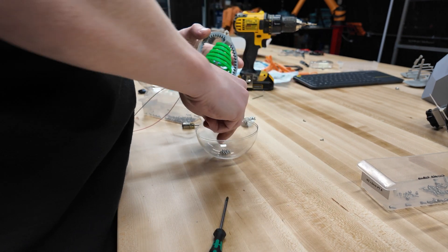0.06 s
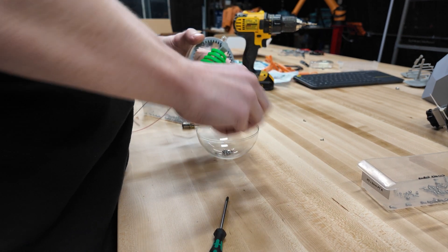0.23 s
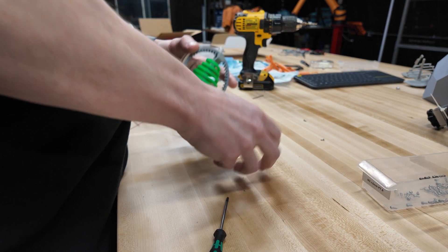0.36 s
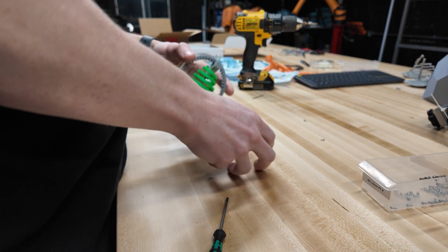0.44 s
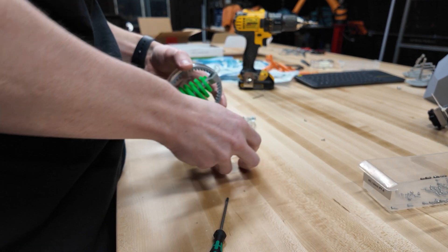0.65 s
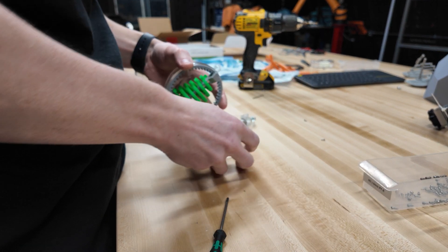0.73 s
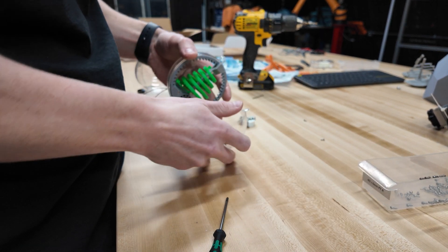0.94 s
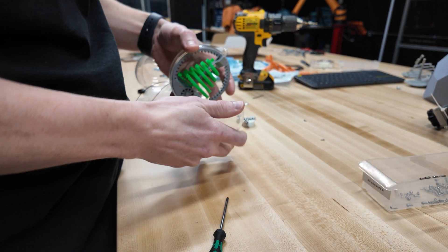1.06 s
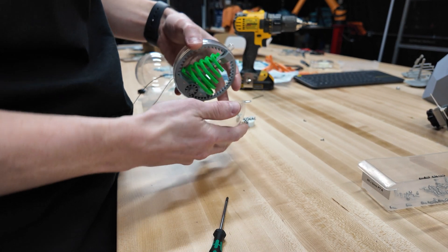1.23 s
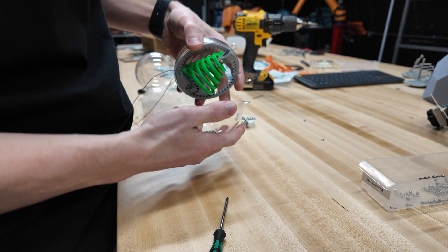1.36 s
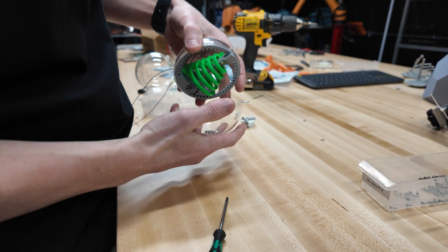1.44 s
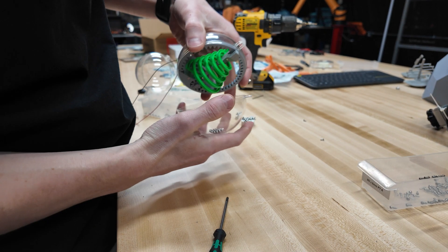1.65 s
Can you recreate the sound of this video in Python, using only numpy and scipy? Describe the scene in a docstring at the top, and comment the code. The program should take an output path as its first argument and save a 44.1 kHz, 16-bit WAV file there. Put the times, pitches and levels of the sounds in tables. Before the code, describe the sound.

Small hard balls drop into a thin plastic bowl at about 0.25 seconds with two sharp, bright clacks. They bounce, roll and circle with a faint hollow note, settling by 0.9 seconds. From 1.1 seconds they tick and roll faintly in a hand-held plastic shell, ending with two light clicks near 1.6 seconds. Soft handling bumps, rubbing and a low workshop ventilation hum lie underneath.

```python
"""Over a workshop's ventilation hum, hands bump and rub on plastic. A quarter second in, small hard
balls drop into a thin plastic bowl on the bench: each hit snaps, cracks and rings the bowl's modes.
They clatter, roll and circle with a hollow note, and settle before the first second is out. Then they
tick and roll faintly in a plastic shell turned in the hands, ending on two clicks at its rim.
The workshop gives the balls a bright tail throughout."""
import sys
import numpy as np
from scipy import signal
from scipy.io import wavfile
from scipy.ndimage import uniform_filter1d

SR = 44100
rng = np.random.default_rng(int(sys.argv[2]) if len(sys.argv) > 2 else 0)


def wrap_up_sound(samples):
    """Save the sound to the file named by the first command line argument, as 16-bit audio."""
    columns = np.atleast_2d(samples).T
    # keep every value between -1 and 1, then stretch to whole-number steps
    tamed = np.clip(columns, -1, 1)
    steps = np.round(tamed * 32767).astype(np.int16)
    wavfile.write(sys.argv[1], SR, steps)


N = 74970
T = np.arange(N) / SR

# ventilation air, its colour: frequency_hz, gain_db
AIR_EQ = [(28, -35.5), (55, -20.5), (110, -10), (160, -4.5), (250, -2), (310, -10), (500, -7), (800, -15),
          (1100, -14), (2000, -23.5), (4400, -31), (7000, -42.5), (15000, -51.5)]
# a brief dip in the air: time_s, gain_db
AIR_RIDE = [(0.5, 1), (0.75, -2.5), (1.35, 0)]
# ventilation hum lines: pitch_hz, level_db
HUM_LINES = [(60, -72.5), (219, -60), (243, -61), (362, -57.5)]
# swell of a thin whine: time_s, level_db
WHINE_RIDE = [(0.95, -68.5), (1.35, -60.5), (1.7, -68.5)]
# decay of the workshop's tail: frequency_hz, t60_s
ROOM_DECAY = [(500, 1), (3000, 0), (6000, .5), (10000, 0.18), (15000, 0.6)]
# colour of its echoes: frequency_hz, gain_db
ROOM_EQ = [(500, -7.5), (3000, -4), (4700, 4), (6000, 2.5), (7200, -4.5), (10000, -6), (15000, -2.5)]

# fingers sliding on plastic: frequency_hz, gain_db
RUB_EQ = [(400, -12), (1050, -1), (1550, -1.5), (1900, -10.5), (3500, -8), (7000, -30.5)]
# swell of that rub: time_s, level_db
RUB_RIDE = [(0, -74), (0.7, -65), (1.08, -68.5), (1.2, -62.5), (1.45, -58), (1.7, -63)]
# soft handling bumps: start_s, level_db, pitch_hz
HAND_BUMPS = [(0.030, -37.5, 235), (0.07, -43, 156), (0.084, -41.5, 216), (0.167, -43.5, 257.5),
              (0.205, -47.5, 136.4), (0.363, -37, 227), (0.474, -41.5, 235.5), (0.873, -45, 252.3),
              (1.267, -36.5, 232), (1.489, -41.5, 167.4)]
# hollow note of a circling ball: time_s, pitch_hz, level_db
CIRCLING_NOTE = [(0.239, 431, -72), (0.291, 448.3, -57), (0.379, 475, -60.5), (0.47, 491.8, -54),
                 (0.55, 499, -57.5), (0.62, 472, -56.5), (0.67, 480, -84)]
# rolling in the bowl: time_s, level_db
BOWL_ROLL_RIDE = [(0.28, -85), (0.31, -39), (0.39, -41), (0.45, -50.5), (0.53, -49.5), (0.59, -63.5),
                  (0.65, -47), (0.69, -54), (0.74, -70), (0.86, -78.5), (1.1, -85)]
# rolling in the hand-held shell: time_s, level_db
SHELL_ROLL_RIDE = [(0.9, -95), (1.12, -80), (1.18, -56), (1.27, -62), (1.32, -67.5), (1.42, -58.5),
                   (1.46, -53.5), (1.55, -69), (1.59, -78), (1.63, -55), (1.7, -77)]

# light ticks in the shell: start_s, level_db, tilt_db_per_octave
SHELL_TICKS = [(1.1415, -44.5, -4), (1.162, -48.5, -5.5), (1.18, -37.5, -3), (1.1880, -36.5, -1),
               (1.2051, -33.5, 3), (1.225, -39.5, 5.5), (1.242, -42, -3), (1.271, -41.5, 1),
               (1.281, -49, 1), (1.38, -37.5, 7), (1.386, -43, -1), (1.4073, -42, -2), (1.43, -33, 11),
               (1.4377, -33.5, 14), (1.4435, -34.5, 6), (1.448, -35.5, 2), (1.494, -37.5, 8),
               (1.5050, -37, -2), (1.512, -30, -0.5), (1.5203, -34, 0), (1.527, -42, 1), (1.534, -37.5, -4),
               (1.5447, -35, -2), (1.549, -39, -10), (1.555, -45, 7), (1.563, -46, 2), (1.61, -38.5, -1),
               (1.6245, -39.5, -11)]
# colour of a tick: frequency_hz, gain_db
TICK_EQ = [(1000, -12), (2500, -12), (4200, -6), (5300, 8.5), (6800, 7), (8500, -0.5), (10000, -5),
           (12000, -15.5), (16000, -40)]
# clicks on the shell's rim: start_s, level_db
RIM_CLICKS = [(1.6295, -33), (1.6576, -40)]
# the bowl's modes: pitch_hz, hard_drop_db, light_bounce_db, t60_s
PLASTIC_MODES = [(1640, -30, -29, .05), (5290, -18, -9, .036), (5850, -18, -9, .03), (6615, -.5, -4, .032),
                 (7170, -14, -10, .032), (7900, -5.5, -7, .034), (8800, -5, -4.5, .036),
                 (9330, -10, -10, .03), (9850, 2, -7.5, .032), (11075, -14, -15, .03),
                 (12380, -13, -15.5, .028), (13355, -9.5, -24, .022), (13895, -11.5, -24, .022),
                 (15420, -24, -30, .022)]
# snap at the instant of contact: frequency_hz, gain_db
SNAP_EQ = [(200, -27.5), (900, -12.5), (1600, -2.5), (2450, -16.5), (3300, -1.5), (4300, 0), (6000, 6),
           (9500, -1), (16000, -23)]
# crack just behind the snap: frequency_hz, gain_db
CRACK_EQ = [(120, -45), (900, -23.5), (1600, -18.5), (2450, -33.5), (3300, -21.5), (4300, -16.5),
            (5500, 2.5), (7000, 3.5), (9800, -7), (11000, -13), (14000, -22.5), (16500, -31.5)]
# balls hitting the bowl: start_s, level_db
BOWL_HITS = [(0.2370, 1), (0.2630, 1), (0.2919, -7), (0.296, -7), (0.299, -13), (0.3288, -11), (0.336, -11),
             (0.351, -22), (0.3616, -12), (0.3782, -17), (0.3894, -20), (0.398, -26.5), (0.456, -25.5),
             (0.4718, -17.5), (0.4802, -23.5), (0.4941, -17), (0.498, -19.5), (0.5072, -21), (0.543, -23.5),
             (0.549, -29.5), (0.621, -35), (0.6294, -37), (0.6397, -24.5), (0.653, -38), (0.6780, -33),
             (0.6884, -23.5), (0.6957, -25.5), (0.7573, -37.5), (0.8060, -40), (0.8143, -33.5),
             (0.821, -35.5), (0.8945, -48), (0.9078, -41)]

AIR_DB, AIR_PATCH_DB, WHINE_HZ, WAVER_HZ, WAVER_DB = -52, 1.5, 1082, 1, 2
TAIL_DB, PREDELAY_S, EARLY_DB, EARLY_T60_S = -12.5, 0.013, -14.5, 0.09
BUMP_ATTACK_S, BUMP_T60_S = 0.015, 0.25
CONTACTS_PER_S, CONTACT_SPREAD_DB, BOWL_GRIT_DB, SHELL_ROLL_RING_DB = 610, 3.5, -3, -7.5
TICK_SNAP_DB, TICK_CRACK_DB, TICK_RING_DB, TICK_T60_S = -10, -9.5, -31, 0.022
CLICK_SNAP_DB, CLICK_RING_DB = -9.5, -17.5
SHELL_HZ, SHELL_T60_S, SHELL_DB = 1626, 0.056, -12
ROLL_TILT, CLICK_TILT = -10.5, 2.3  # dB per octave
HIT_SNAP_DB, HIT_CRACK_DB, HIT_RING_DB, HIT_CRACK_T60_S = -6.5, -18, -15, 0.026
HARD_RANGE_DB = 5.5  # span of level from a light bounce to a hard drop
HARD_CRACK_DB = -2  # hard drops are more ring than crack
DULL_FROM_HZ, EDGE_HZ, DULLING = 8500, 16200, 0.3  # faint hits lose top: dB at the edge per dB of level
CONTACT_S, MODE_SCATTER_DB, PIVOT_HZ = 0.00015, 1, 8000
BALL_DETUNE, GRIP_DETUNE = 0.009, 0.035  # share of pitch by which the balls' load or a grip shifts modes


def amp(db):
    """Decibels to gain."""
    return 10 ** (np.asarray(db) / 20)


def unit(x):
    """Scales to rms 1."""
    return x / np.sqrt(np.mean(x ** 2) + 1e-20)


def curve_at(points, hz):
    """Reads a curve on a log-frequency axis."""
    frequencies, values = np.transpose(points)
    return np.interp(np.log(hz + 1), np.log(frequencies + 1), values)


def ride(points):
    """A fader ride: gain over time from time_s, level_db points."""
    return amp(np.interp(T, *np.transpose(points)))


def add(mix, start_s, sound):
    """Lays a sound into the mix."""
    part = mix[round(start_s * SR):][:len(sound)]
    part += sound[:len(part)]


def tilt_db(hz, tilt):
    """Brightness of a harder or softer contact: dB per octave about the pivot, flat in the lows."""
    return tilt * np.log2(np.maximum(hz, PIVOT_HZ / 2) / PIVOT_HZ)


def eq(x, points, tilt=0):
    """Minimum-phase EQ with an optional treble tilt."""
    hz = abs(np.fft.fftfreq(len(x), 1 / SR))
    log_gain = np.log(amp(curve_at(points, hz) + tilt_db(hz, tilt)))
    return np.fft.ifft(np.fft.fft(x) * np.exp(np.conj(signal.hilbert(log_gain)))).real


def fade(t, t60):
    """Exponential decay, 60 dB down at t60."""
    return np.exp(-np.log(1000) * t / t60)


def wander(samples=3000):
    """Smooth random drift of rms 1."""
    return unit(uniform_filter1d(uniform_filter1d(rng.standard_normal(N), samples), samples))


def wavering_tone(hz):
    """A sine of rms 1 that drifts slightly in pitch and level."""
    turns = np.cumsum(hz + WAVER_HZ * wander()) / SR + rng.random()
    return unit(amp(WAVER_DB * wander()) * np.sin(2 * np.pi * turns))


def ventilation():
    """The bed: softly uneven air noise, hum lines and a thin whine."""
    spectrum = signal.stft(rng.standard_normal(N), nperseg=1024, noverlap=768)[2]
    patches = uniform_filter1d(rng.standard_normal(spectrum.shape), size=10, axis=0)
    patches = unit(uniform_filter1d(patches, size=10, axis=1))
    air = signal.istft(spectrum * amp(AIR_PATCH_DB * patches), nperseg=1024, noverlap=768)[1][:N]
    hum = sum(amp(db) * wavering_tone(hz) for hz, db in HUM_LINES)
    whine = ride(WHINE_RIDE) * wavering_tone(WHINE_HZ)
    return amp(AIR_DB) * ride(AIR_RIDE) * unit(eq(air, AIR_EQ)) + hum + whine


def workshop_reverb(x):
    """Early reflections off the bench and the body, then the workshop's bright tail."""
    t = T[:SR]
    taps = rng.standard_normal(SR) * (rng.random(SR) < 1 / 10)
    hz, frame_s, spectrum = signal.stft(taps, SR, nperseg=256)
    spectrum *= fade(frame_s, curve_at(ROOM_DECAY, hz)[:, None])
    tail = signal.istft(spectrum, SR, nperseg=256)[1][:SR] * np.clip((t - PREDELAY_S) / 0.00092, 0, 1)
    early = rng.choice([-1., 1.], SR) * (rng.random(SR) < 1 / 50)
    early *= fade(t, EARLY_T60_S) * (t > PREDELAY_S)
    echoes = (amp(TAIL_DB) * unit(tail) + amp(EARLY_DB) * unit(early)) / np.sqrt(SR)
    return signal.fftconvolve(x, eq(echoes, ROOM_EQ))[:N]


def handling():
    """Fingers rub on the plastic and bump it with dull, low notes."""
    out = ride(RUB_RIDE) * unit(eq(rng.standard_normal(N), RUB_EQ))
    t = T[:SR // 4]
    envelope = np.minimum(t / BUMP_ATTACK_S, 1) * fade(t, BUMP_T60_S)
    for start_s, db, hz in HAND_BUMPS:
        add(out, start_s, amp(db) * envelope * np.sin(2 * np.pi * hz * t))
    return out


def circling():
    """A ball circling the bowl sings a hollow, gliding note."""
    time_s, hz, db = np.transpose(CIRCLING_NOTE)
    turns = np.cumsum(np.interp(T, time_s, hz)) / SR
    gate = (T > time_s[0]) * (T < time_s[-1])
    return amp(np.interp(T, time_s, db)) * gate * np.sin(2 * np.pi * turns)


def plastic_ring(t, hardness=0, tilt=0, detune=BALL_DETUNE):
    """The plastic's modes, balanced by the hardness of the hit; lighter hits stray more in pitch."""
    modes = np.zeros(len(t))
    for hz, hard_db, light_db, t60 in PLASTIC_MODES:
        scatter, shift = rng.standard_normal(2)
        db = light_db + hardness * (hard_db - light_db) + tilt_db(hz, tilt) + MODE_SCATTER_DB * scatter
        turns = hz * (1 + detune * (1 - hardness) * shift) * t + rng.random()
        modes += amp(db) * fade(t, t60) * np.sin(2 * np.pi * turns)
    attack = 1 - np.exp(-(t / CONTACT_S) ** 2)
    return modes * attack


def contact_crack(t, points, tilt, t60):
    """A noise burst for the crowd of quickly damped modes that a contact wakes."""
    decay = fade(t, t60)
    burst = eq(rng.standard_normal(len(t)) * decay, points, tilt)
    return unit(burst) * np.sqrt(np.mean(decay ** 2))


def rolling_contacts():
    """Dense tiny contacts of one ball rolling on plastic."""
    strength = amp(CONTACT_SPREAD_DB * np.minimum(rng.exponential(1, N), 4))
    return strength * rng.choice([-1., 1.], N) * (rng.random(N) < CONTACTS_PER_S / SR)


def rolling(count=4):
    """Rolling balls keep the free bowl singing; in the hand-held shell they are a dry scrape."""
    balls, t = [rolling_contacts() for _ in range(count)], T[:SR // 8]
    grit = unit(eq(sum(balls), TICK_EQ))
    ring = unit(sum(signal.fftconvolve(ball, plastic_ring(t, tilt=ROLL_TILT))[:N] for ball in balls))
    in_bowl = ride(BOWL_ROLL_RIDE) * unit(ring + amp(BOWL_GRIT_DB) * grit)
    in_shell = ride(SHELL_ROLL_RIDE) * unit(grit + amp(SHELL_ROLL_RING_DB) * ring)
    return in_bowl + in_shell


def shell_ticks():
    """Balls tap the shell lightly; the hand damps its ring."""
    out, t = np.zeros(N), T[:SR // 8]
    for start_s, db, tilt in SHELL_TICKS:
        snap = amp(TICK_SNAP_DB) * eq(signal.unit_impulse(len(t)), TICK_EQ, tilt)
        ring = amp(TICK_RING_DB) * plastic_ring(t, tilt=tilt, detune=GRIP_DETUNE)
        crack = amp(TICK_CRACK_DB) * contact_crack(t, TICK_EQ, tilt, TICK_T60_S)
        add(out, start_s, amp(db) * (snap + crack + ring))
    return out


def rim_clicks():
    """Clicks on the rim ring the whole shell, down to its low note."""
    out, t = np.zeros(N), T[:SR // 8]
    snap = eq(signal.unit_impulse(len(t)), SNAP_EQ, CLICK_TILT)
    low_note = amp(SHELL_DB) * np.sin(2 * np.pi * SHELL_HZ * t) * fade(t, SHELL_T60_S)
    for start_s, db in RIM_CLICKS:
        attack = amp(CLICK_SNAP_DB) * (snap + contact_crack(t, SNAP_EQ, CLICK_TILT, TICK_T60_S))
        ring = amp(CLICK_RING_DB) * plastic_ring(t, hardness=0.91, tilt=CLICK_TILT)
        add(out, start_s, amp(db) * (attack + ring + low_note))
    return out


def bowl_bounces():
    """Each ball hitting the bowl makes a sharp snap, a short crack and a ring; faint hits are duller."""
    out, t = np.zeros(N), T[:SR // 8]
    snap = amp(HIT_SNAP_DB) * eq(signal.unit_impulse(len(t)), SNAP_EQ)
    for start_s, db in BOWL_HITS:
        hardness = np.clip(0.5 + db / HARD_RANGE_DB, 0, 1)
        crack_db = HIT_CRACK_DB + HARD_CRACK_DB * hardness
        crack = amp(crack_db) * contact_crack(t, CRACK_EQ, 0, HIT_CRACK_T60_S)
        ring = amp(HIT_RING_DB) * plastic_ring(t, hardness)
        top_shelf = [(DULL_FROM_HZ, 0), (EDGE_HZ, DULLING * db)]
        add(out, start_s, amp(db) * eq(snap + crack + ring, top_shelf))
    return out


def scene():
    """Mono mix: hits and rolling feed the reverb; the hollow note, hands and ventilation stay dry."""
    balls = bowl_bounces() + shell_ticks() + rim_clicks() + rolling()
    return (balls + workshop_reverb(balls) + circling() + handling() + ventilation())[None]


def record(dry):
    """A steep low-pass trims the very top."""
    lowpass = signal.firwin(255, EDGE_HZ, window=("kaiser", 9), fs=SR)
    return signal.oaconvolve(dry, lowpass[None], "same")


dry = scene()
out = record(dry)
wrap_up_sound(out)
```